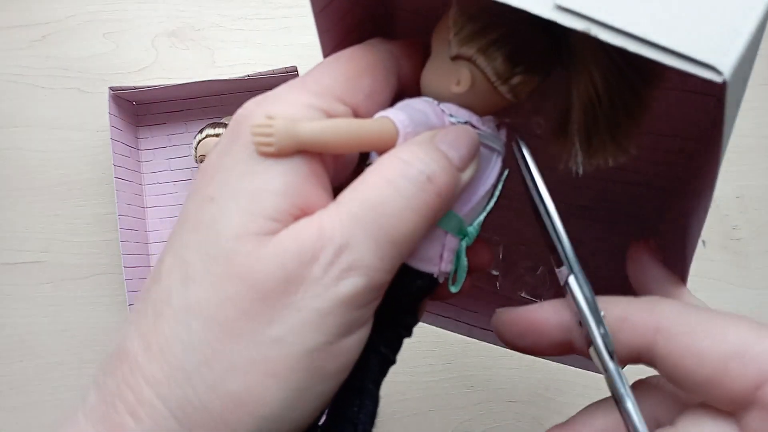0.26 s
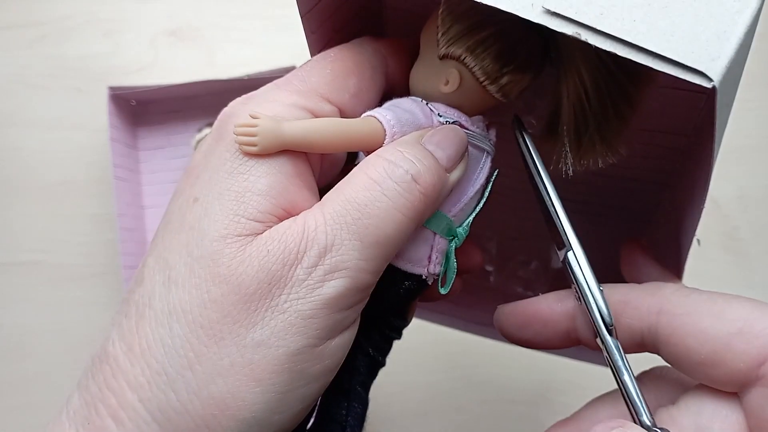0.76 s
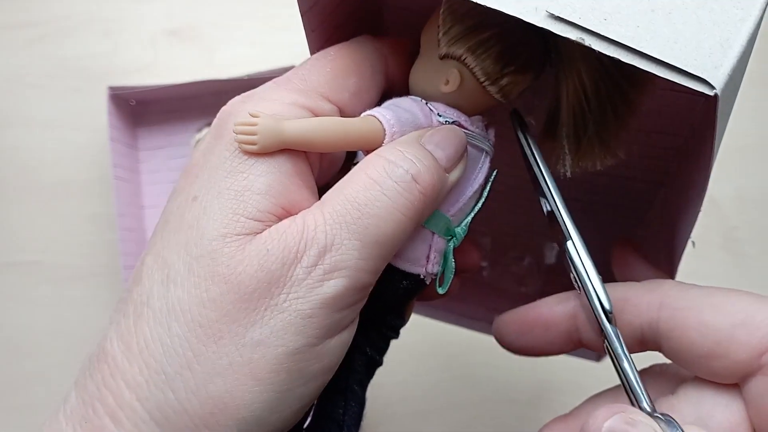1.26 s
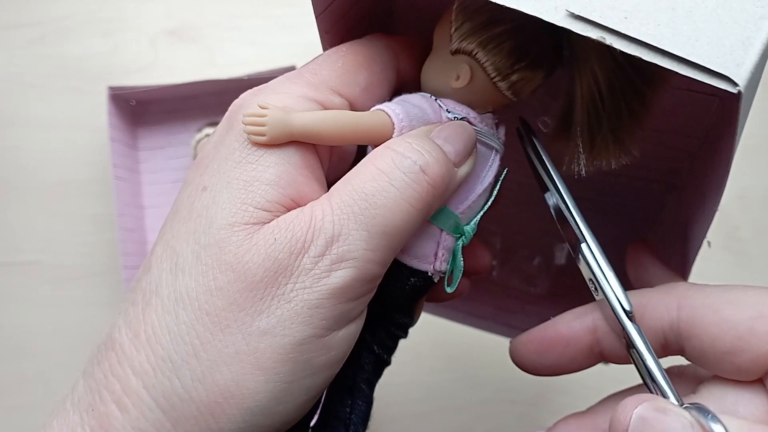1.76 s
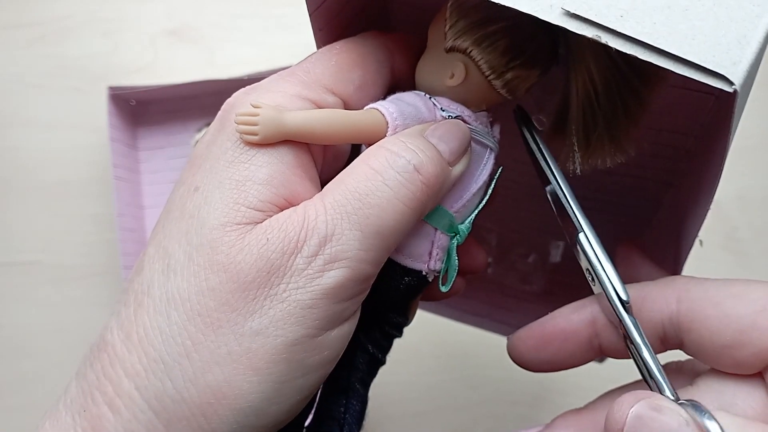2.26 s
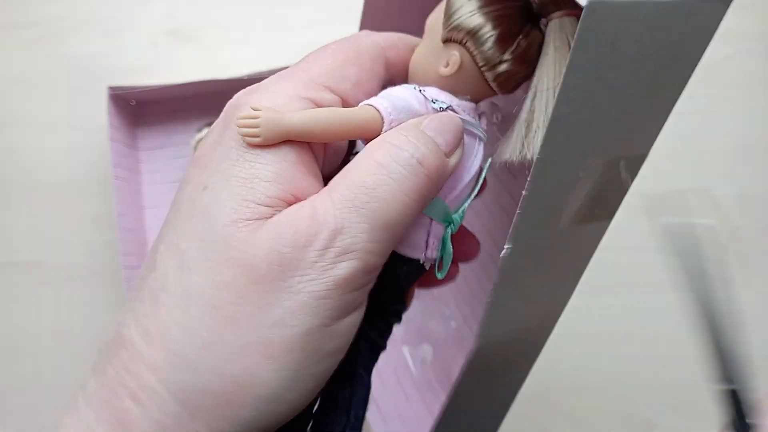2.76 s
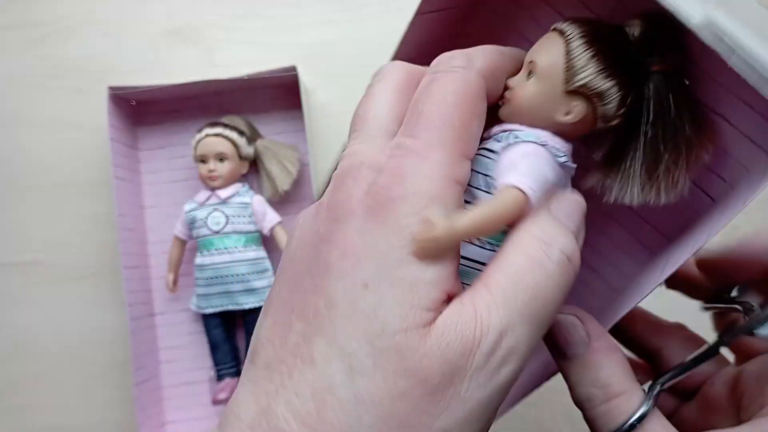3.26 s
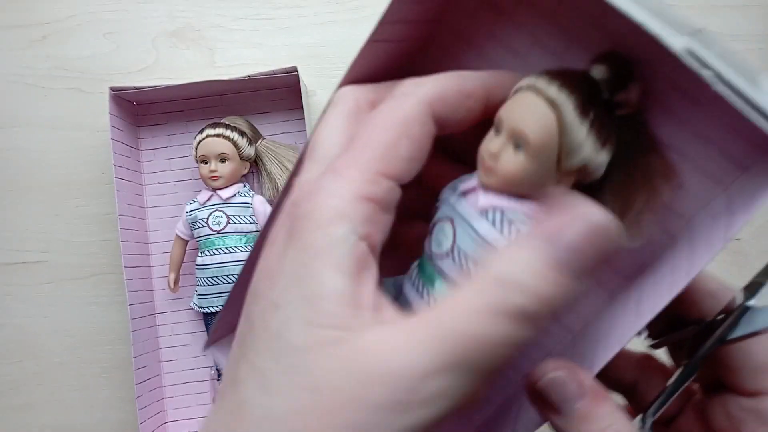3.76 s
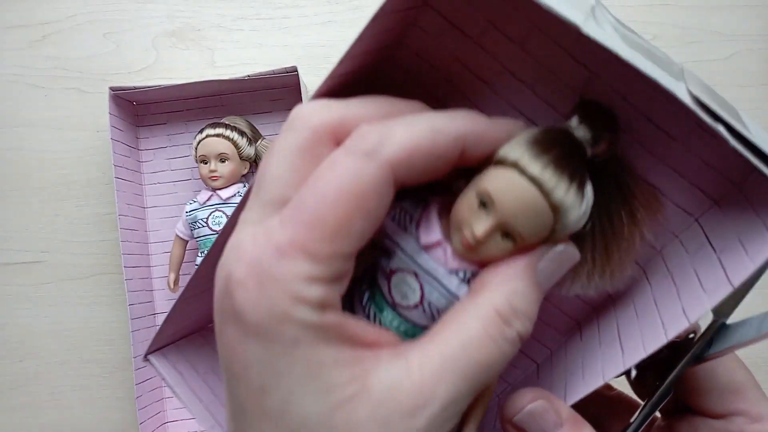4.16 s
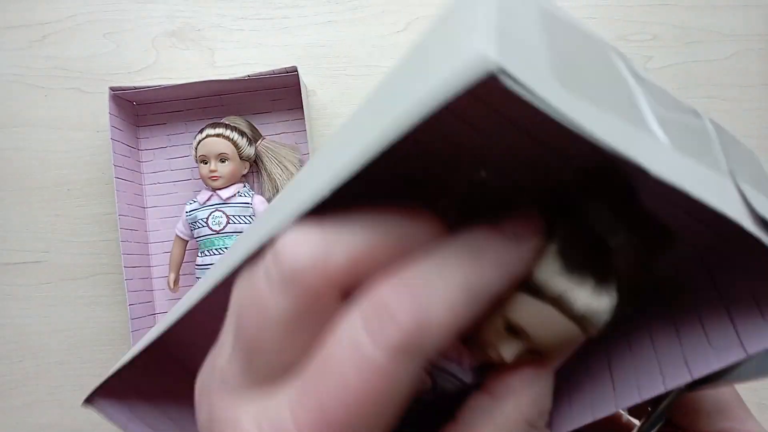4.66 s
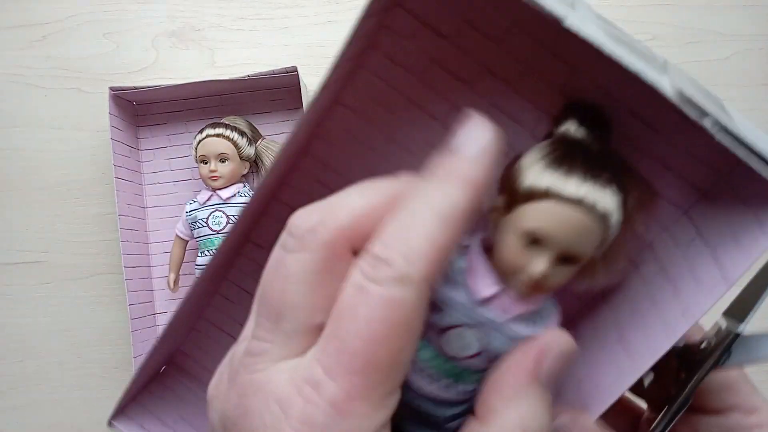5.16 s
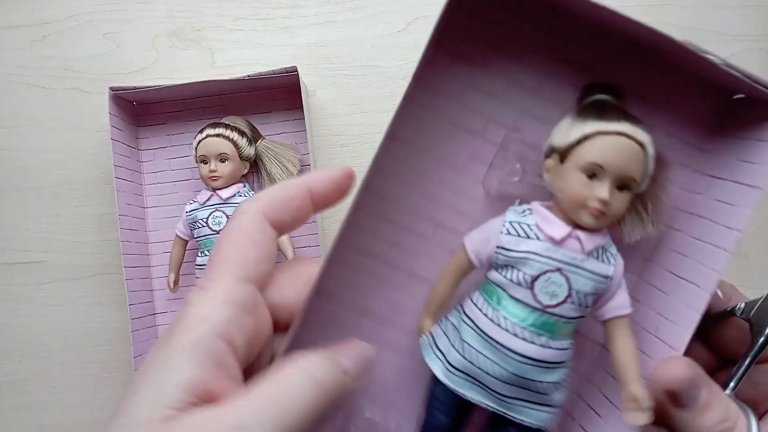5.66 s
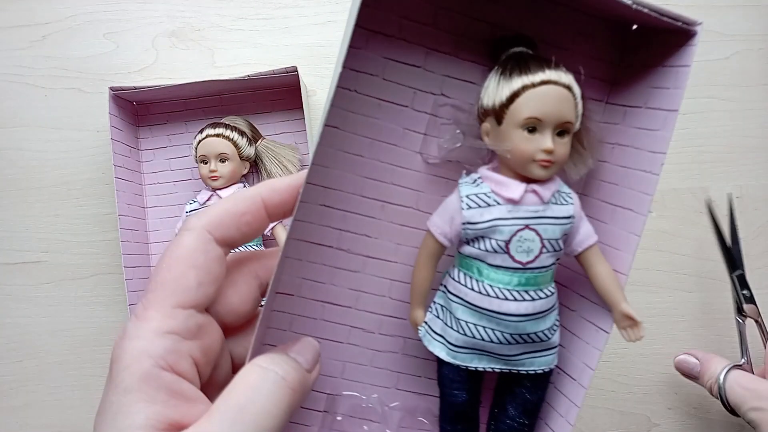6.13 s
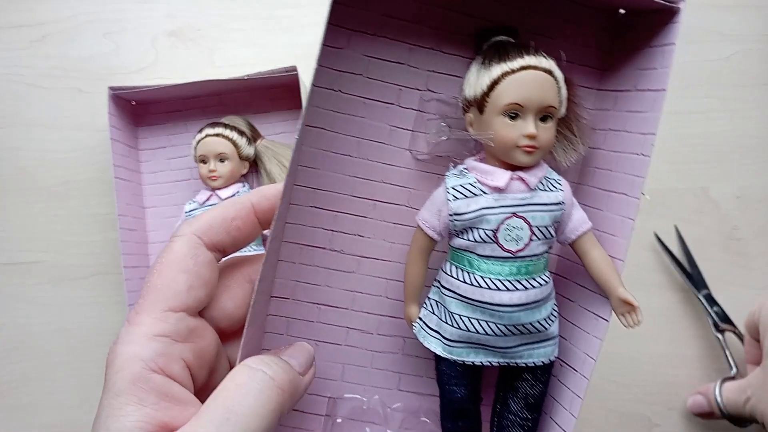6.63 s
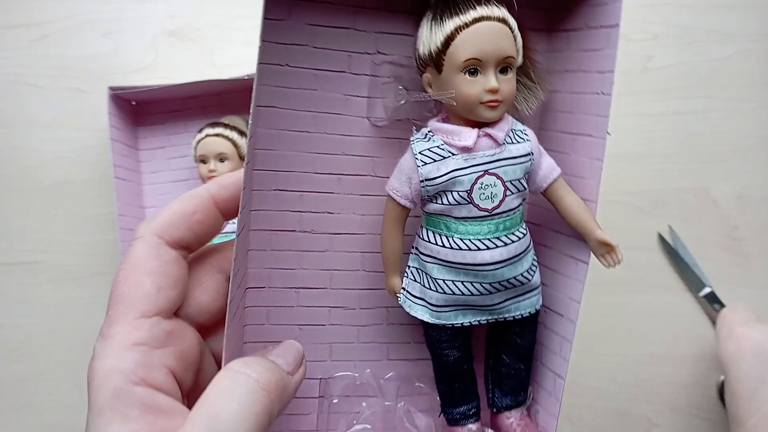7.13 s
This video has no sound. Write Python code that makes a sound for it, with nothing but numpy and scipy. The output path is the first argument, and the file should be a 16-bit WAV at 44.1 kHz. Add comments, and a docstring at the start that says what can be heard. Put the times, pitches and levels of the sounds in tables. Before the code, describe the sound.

A close stereo recording in a small furnished room, with quiet low room noise and a faint steady machine hum, fluttering about eighteen times a second with soft scuffs and tiny chirps. After a barely audible bump and rustle at 0.2 s, a loud dry plastic crack comes at 1.4. At 2.4 a pair of cracks almost merges, with a hollow thump and brief cardboard ring. A tiny blade squeak precedes a rattling cluster of box knocks around 2.75. Soft rustling strokes of cloth and hair run from 3 to 5.8, with plastic ticks, a hard hollow knock at 4.03 and lighter bumps near 5.0, 5.3 and 5.8. Small metallic pivot clicks follow from 6 to 7, clearest at 6.44 and 6.79. Blades scrape and squeak thinly from 6.6, more densely near 7.15, then scissors strike the table loudly at 7.21, a bright steel clatter with quick, weaker bounces.

```python
"""Freeing a doll from its box

Scissors snip taut plastic fasteners inside a cardboard toy box, close by in a small room: each crack is shaped noise.
The box is bumped (decaying low tones, noise bursts and rings) and the doll rustles (swelling hiss with tiny snaps).
The blades scrape and squeak, then clatter onto the table: resonances driven by noise, and decaying steel tones.
Behind it all a machine spins steadily: humming tones and, on every turn, a scuff of noise and a faint chirp."""
import sys
import numpy as np
from scipy import signal
from scipy.fft import rfft, irfft
from scipy.io import wavfile
from scipy.ndimage import uniform_filter1d

SR = 44100
rng = np.random.default_rng(int(sys.argv[2]) if len(sys.argv) > 2 else 0)


def materialize(psi):
    """Save the field psi as 16-bit PCM at rate SR to the path in sys.argv[1].

    A 1-D psi becomes a single channel; in a 2-D psi each row is a channel.
    """
    bounded = np.clip(np.atleast_2d(psi).T, -1, 1)
    quanta = np.round(bounded * 32767).astype(np.int16)
    wavfile.write(sys.argv[1], SR, quanta)


N = 325899
T = np.arange(N) / SR
HIT = T[:SR // 2]  # the half second given to each short sound

# In all tables and settings, t60 is the time of the exponential decay to fall by 60 dB.
# fasteners parting and whipping back: (time [s], crack [dB], crack t60 [s], panel ring [dB], thump [dB],
# thump pitch [Hz], blade ring [dB], left minus right [dB])
SNIPS = [(1.3771, -9, 0.021, -31, -21, 400, -52, 1.5), (2.3868, -10.5, 0.05, -13, -16, 236, -43, 1),
         (2.3980, -12.5, 0.02, -24, -40, 520, -53, 1.5)]
# colour of each of those three cracks, one list per snip: (frequency [Hz], level [dB])
CRACK_COLOURS = [
    [(60, -28), (200, -6), (500, -4), (720, -12), (1030, -5), (1400, -12), (2050, -16), (2500, 2),
     (2900, -1), (3300, -14), (3600, -3), (4000, -17), (4350, -8), (5000, -14), (9600, -4), (11700, -16),
     (12500, -8), (13500, -18)],
    [(60, -25), (200, -6), (500, -7), (1100, -7), (1400, 1), (1750, -5), (2500, 2), (3600, -3), (4300, -10),
     (5700, -6), (7000, -10), (9800, -1), (12000, -10), (16000, -20)],
    [(300, -13), (860, -2), (1100, -8), (1450, 4), (2000, 0), (2800, 1), (3600, -5), (4500, -11),
     (7000, -13), (10000, -8), (12000, -16), (16000, -26)],
]
# cardboard panels (first half) and plastic holder (second half): (frequency [Hz], level [dB], t60 [s])
BOX_MODES = [(519, -6, .05), (650, -14, .04), (869, 0, .065), (1015, -9, .04), (1315, 0, .06),
             (1535, -3, .05), (2070, -8, .035), (2495, 3, .06), (2620, -7, .04), (2782, 1, .06),
             (2932, -5, .045), (3128, -4, .06), (3420, -4, .035)]

# box and doll bumped by the hands: (time [s], cardboard clack [dB], wall thud [dB], plastic tick [dB])
KNOCKS = [(.219, -47, -54, -49), (2.645, -43, -58, -48), (2.7434, -29, -22, -45), (2.754, -31.5, -28, -43),
          (2.7625, -35, -28, -44), (2.7693, -31, -32, -42), (2.781, -45.5, -35.5, -56),
          (3.9555, -44, -31, -60), (4.013, -44.5, -38, -50), (4.0318, -21, -23.5, -34),
          (4.0628, -31.5, -42, -66), (4.717, -49, -39, -68), (5.014, -47, -37.5, -66),
          (5.028, -37, -46, -32.5), (5.034, -42.5, -33.5, -61), (5.264, -38.5, -45, -45),
          (5.285, -45, -37, -64), (5.315, -39, -36, -49), (5.7713, -47, -40.5, -40), (5.792, -42, -38, -44),
          (5.903, -42.5, -40.5, -48), (5.914, -44.5, -39.5, -56)]
# colour of the cardboard clack: (frequency [Hz], level [dB])
CLACK_COLOUR = [(250, -1), (900, 0.5), (1120, -2), (1350, 2.5), (1700, 5), (2080, 1.5), (2330, -16),
                (2600, -8), (3200, -29), (4000, -11.5), (12000, -25)]
# colour of the stiff plastic jolted through the box: (frequency [Hz], level [dB])
JOLT_COLOUR = [(1000, -13), (2500, 4.5), (6000, 1.5), (8500, 2.5), (10300, 9), (12000, -13), (16000, -24)]
# the shaken holder buzzes against the box: (time [s], level [dB])
RATTLES = [(2.754, -35), (2.7622, -37), (2.7695, -39)]
# the plastic holder ticks as it flexes: (time [s], level [dB])
TICKS = [(3.008, -48.5), (3.509, -45), (4.0, -36), (4.747, -42.5), (5.0234, -29.5), (5.0825, -42),
         (5.7713, -36.5)]
# colour of those ticks: (frequency [Hz], level [dB])
TICK_COLOUR = [(1000, -33), (3000, -0.5), (6000, -5), (8000, 6), (10500, 13.5), (12500, 1), (16000, -4)]
KNOCK_PAN_DB, TICK_PAN_DB = 2.5, -2  # left minus right
TICK_T60_S = 0.015
# a softer contact flexes a larger, lower patch of the wall
THUD_HZ = 571
THUD_OCTAVE_DB = 21  # excess of thud over clack that lowers it an octave
THUD_SCATTER_OCTAVES = 0.055  # no two contacts land on the same spot
THUD_CYCLES = 13  # swings until the wall has died away

# strokes of hair, cloth and skin in the box: (middle [s], length [s], level [dB], extra treble [dB])
RUBS = [(0.234, .06, -57.5, 2), (3.002, 0.055, -66, 9), (3.42, 0.15, -54, 1.5), (3.544, .09, -51, -9),
        (3.67, 0.042, -53.5, -6), (3.85, 0.18, -53, -2), (4.043, 0.24, -54.5, 1.5), (4.79, 0.11, -56.5, 2),
        (5.016, .1, -51.5, 5.5), (5.28, 0.15, -58.5, -1), (5.67, 0.041, -55, 4), (5.745, .06, -53.5, 2),
        (5.814, .07, -49, 8)]
# colour of their hiss: (frequency [Hz], level [dB])
RUSTLE_COLOUR = [(300, 10.5), (700, 8), (1500, 4.5), (3000, -4.5), (6000, -9.5), (8500, -4.5), (10300, -4),
                 (12000, -11), (15500, -19)]
RUB_EDGE_DB, RUB_SHAPE = -6, 1.53  # level at either end of a stroke; roundness of its swell
CRACKLE_DB = -11  # snaps relative to the hiss
RUB_TREBLE_HZ = 6000  # the extra treble begins here

# blades sliding over each other; the last row is a brief, high steel ring as the scissors touch down:
# (middle [s], length [s], squeak or ring [dB], scrape [dB], squeak or ring frequency [Hz],
# glide [share of that frequency over the stroke])
SLIDES = [(2.016, .009, -51, -62, 1300, 0), (2.652, 0.021, -49, -58, 1450, 0.26),
          (6.627, 0.031, -58, -54, 3010, 0), (6.797, 0.016, -54, -54, 1980, 0),
          (6.853, .058, -51, -48.5, 2910, -0.089), (7.013, 0.037, -53, -55, 3350, 0.063),
          (7.136, .048, -48.5, -47.5, 3740, -0.014), (7.145, 0.063, -48.5, -47, 4640, -.02),
          (7.163, 0.042, -53, -46, 2720, -.04), (7.199, 0.021, -48, -44, 12950, 0)]
# resonances of the hand-held blades: (frequency [Hz], width [Hz], level [dB])
BLADE_RESONANCES = [(2070, 100, -6), (2860, 320, -3), (4630, 130, -4), (5650, 260, -6), (7600, 220, -2),
                    (8800, 550, -1.5), (10400, 200, 3), (11700, 700, -8), (13100, 220, -4),
                    (14600, 500, -11)]
# bending modes stirred by a squeak: (frequency [multiple of its pitch], level [dB])
SQUEAK_MODES = [(.71, -9), (1.58, -15), (2.63, -7)]
# the loose scissors click at the pivot: (time [s], level [dB])
CLICKS = [(5.974, -41), (6.163, -57), (6.372, -54.5), (6.4374, -36.5), (6.535, -44), (6.789, -30.5),
          (6.991, -43)]
# colour of those clicks: (frequency [Hz], level [dB])
PIVOT_COLOUR = [(1000, -30), (3000, 0), (6000, -4), (8000, 3), (10700, 12), (12000, 4), (16000, 0)]
SLIDE_SHAPE, RASP_DB = 2.5, 2.4  # squareness of a stroke; unevenness of its scrape
CLICK_T60_S, CLICK_RING_DB, CLICK_PAN_DB = 0.04, -22, -1.5

# scissors landing on the table: (time [s], level [dB], table knock [dB], left minus right [dB])
DROPS = [(7.188, -46, -36, 0), (7.194, -46, -39, 0), (7.211, -13, -33.5, 3.5), (7.2122, -12, -39.5, -12.5),
         (7.220, -26.5, -50, 11), (7.245, -30.5, -42, 0), (7.2548, -23.5, -40, 1), (7.270, -37, -42.5, 6)]
# steel resonances, broadened while the scissors touch the table:
# (frequency [Hz], width [Hz], level [dB], left minus right [dB])
CLATTER = [(1612, 260, -12.5, -4.5), (2912, 260, -0.5, 0), (3660, 870, -2, 5), (4550, 180, -1, -2),
           (5850, 490, 2.5, -5), (8000, 760, -2.5, -4), (9100, 540, -6, 2), (10040, 230, -2.5, 4),
           (11150, 370, -4.5, 16), (13000, 350, -1.5, 5), (14780, 220, -9, 0)]
# free ring of the steel blades and handles: (frequency [Hz], level [dB], t60 [s])
STEEL_MODES = [(2283, -12, .2), (2817, -6, .08), (4604, -4, .09), (4720, -5, .08), (5790, -4, .07),
               (9163, 0.5, .16), (10168, -8, .12), (10531, -6, .09), (11414, -2, .1), (12713, -2, .15),
               (12906, -4, .15), (12971, -2, .15), (14120, -12, .16), (14770, -9, .13)]
# a firm blow lifts off at once, a light one skids on: (level [dB], t60 [s])
SKID = [(-20, 0.07), (-12, 0.023)]
# colour of a knock on the wooden table top: (frequency [Hz], level [dB])
TABLE_COLOUR = [(200, 2), (450, 3), (750, -5), (1250, 2), (1900, 2), (2600, -4), (12000, -22)]
DROP_RING_DB = -16  # free ring relative to the blow

# the machine's hum, before its slight drift: (frequency [multiple of the turning rate], rms level [dB])
HUM = [(3.2, -63.5), (4.86, -51.5), (6, -49.5), (7, -56.5), (9, -55), (10, -58), (20, -71), (34, -70.5)]
# the chirp that the machine makes on each turn, before its flicker: (time [s], level [dB])
CHIRP = [(.5, -60.5), (2.2, -63), (3.0, -67), (6.0, -66.5)]
# colour of the scuff once a turn: (frequency [Hz], level [dB])
SCUFF_COLOUR = [(900, -7), (1600, 12.5), (2200, -25), (3900, 2.5), (4600, -26.5), (8000, -6.5),
                (14000, -42)]
TURN_HZ = 18.3  # turns per second
CHIRP_AT_TURN = 0.29  # place of chirp and scuff, as a share of a turn
# colour of the steady room noise: (frequency [Hz], relative level per Hz [dB])
AIR_COLOUR = [(20, -14), (42, -16.5), (75, -9), (110, -2), (150, -6), (205, -1), (300, -8), (430, -18),
              (900, -16.5), (1200, -22.5), (2200, -24.5), (3300, -32.5), (3950, -32.5), (4500, -37),
              (7000, -41.5), (10200, -36), (12000, -48.5), (16000, -56.5)]
AIR_DB = -46
# stereo width of noise in the room: (frequency [Hz], side minus mid [dB])
WIDTH = [(60, -22), (200, -20.5), (380, -3.5), (700, 2.5), (1290, 2.5), (2400, 2), (4400, -1), (15000, 0.5)]
# stereo width of sounds close to the microphones: (frequency [Hz], side minus mid [dB])
NEAR_WIDTH = [(100, -5), (400, -8), (2500, -2), (8000, 0.5)]
# colour of the room's tail: (frequency [Hz], level [dB])
ROOM_COLOUR = [(100, -12), (500, 11), (1000, 2.5), (2700, -5), (6000, -2.5), (10000, -5.5), (15000, -4.5)]
LOW_CUT_HZ, TOP_HZ = 42, 16200  # limits of the recorder


def snips():
    """The plastic gives way: a crack, the freed box wall thumps and rings, the blades meet."""
    out = np.zeros((2, N))
    for snip, colour in zip(SNIPS, CRACK_COLOURS):
        s, crack_db, t60, panel_db, thump_db, thump_hz, blade_db, pan_db = snip
        crack = amp(crack_db) * burst(colour, t60)
        panels = amp(panel_db) * ring(BOX_MODES)
        thump = amp(thump_db) * thud(thump_hz, t60=0.048, spread=1.36, share=0.4) * balance(pan_db=2.0)
        steel = amp(blade_db) * ring(STEEL_MODES)
        add(out, s, crack + panels + thump + steel, pan_db)
    return out


def handling():
    """The box is bumped and rebounds, rattling the holder; the holder also ticks on its own."""
    out = np.zeros((2, N))
    for s, clack_db, thud_db, tick_db in KNOCKS:
        add(out, s, knock(clack_db, thud_db, tick_db), KNOCK_PAN_DB)
    for s, db in RATTLES:
        buzz = resonance(hz=3270, width=260) * fade(t60=0.028)
        add(out, s, amp(db) * buzz, pan_db=-2.0)
    for s, db in TICKS:
        add(out, s, amp(db) * burst(TICK_COLOUR, TICK_T60_S), TICK_PAN_DB)
    return out


def knock(clack_db, thud_db, tick_db):
    """One contact: the wall thuds, the cardboard clacks, the stiff plastic ticks."""
    half = len(BOX_MODES) // 2
    cardboard, plastic = BOX_MODES[:half], BOX_MODES[half:]
    octaves_down = min(clack_db - thud_db, 0) / THUD_OCTAVE_DB  # zero or negative
    scatter = THUD_SCATTER_OCTAVES * rng.uniform(-1, 1)
    hz = THUD_HZ * 2 ** (octaves_down + scatter)
    wall = thud(hz, t60=THUD_CYCLES / hz, spread=1.3, share=0.28)
    clack = burst(CLACK_COLOUR, t60=0.017) + amp(-13) * ring(cardboard)
    tick = amp(-1.5) * burst(JOLT_COLOUR, t60=0.032) + amp(-11.5) * ring(plastic)
    return amp(thud_db) * wall + amp(clack_db) * clack + amp(tick_db) * tick


def thud(hz, t60, spread, share):
    """A cardboard wall flexing: one low mode and its two neighbours."""
    modes = [(1 / spread, share), (1, 1), (spread, share)]
    return sum(size * np.sin(2 * np.pi * hz * ratio * HIT) for ratio, size in modes) * fade(t60)


def blades():
    """Edge rubs on edge in uneven slips, with gliding squeaks; the pivot clicks; a high ring at touchdown."""
    out = np.zeros((2, N))
    for s, length, tone_db, scrape_db, tone_hz, glide in SLIDES:
        travel = HIT / length - 2  # 0 in the middle of the stroke
        pressure = np.exp(-abs(2 * travel) ** SLIDE_SHAPE)
        rasp = amp(RASP_DB * walk(350)[:len(HIT)])
        steel = sum(amp(db) * resonance(hz, width) for hz, width, db in BLADE_RESONANCES)
        scrape = amp(scrape_db) * unit(steel * rasp)
        pitch = tone_hz * (1 + glide * np.clip(travel, -.5, .5))  # the contact point travels along the blade
        add(out, s - 2 * length, pressure * (scrape + amp(tone_db) * steel_tone(pitch)), 0)
    for s, db in CLICKS:
        click = burst(PIVOT_COLOUR, CLICK_T60_S) + amp(CLICK_RING_DB) * ring(STEEL_MODES)
        add(out, s, amp(db) * click, CLICK_PAN_DB)
    return out


def steel_tone(hz, wobble=0.75, flutter_db=3.2):
    """A squeak (blades stick and slip) or high ring: one unsteady pitch, which stirs other bending modes."""
    wander = wobble * walk(340)[:len(HIT)]
    start = rng.uniform(0, np.pi / 2, (2, 1))  # differs between the two microphones
    phase = 2 * np.pi * np.cumsum(hz) / SR + wander + start
    tone = unit(np.sin(phase) * amp(flutter_db * walk(250)[:len(HIT)]))
    audible = [(ratio, db) for ratio, db in SQUEAK_MODES if ratio * hz.max() < TOP_HZ]
    return tone + sum(amp(db) * resonance(ratio * hz, width=90) for ratio, db in audible)


def scissors_down():
    """The scissors land, bounce and ring free between the contacts."""
    out = np.zeros((2, N))
    for s, blow_db, table_db, pan_db in DROPS:
        t60 = np.interp(blow_db, *np.transpose(SKID))
        steel = sum(amp(db) * balance(side_db) * resonance(hz, width) for hz, width, db, side_db in CLATTER)
        clatter = unit(steel) * fade(t60)
        blow = amp(blow_db) * (clatter + amp(DROP_RING_DB) * ring(STEEL_MODES))
        table = amp(table_db) * burst(TABLE_COLOUR, t60=0.067)
        add(out, s, blow + table, pan_db)
    return out


def rubbing():
    """Strokes swell and die away; fibres catch and slip, breaking the hiss into grains of uneven size."""
    grains = unit(amp(2.2 * walk(700) + 3.4 * walk(45)))
    hiss = noise(RUSTLE_COLOUR, N) * grains + amp(CRACKLE_DB) * crackle()
    dull = signal.sosfiltfilt(signal.butter(2, RUB_TREBLE_HZ, fs=SR, output="sos"), hiss)
    treble = hiss - dull
    out = 0
    for s, length, db, treble_db in RUBS:
        pressure = amp(db + RUB_EDGE_DB * abs(2 * (T - s) / length) ** RUB_SHAPE)
        out = out + pressure * (dull + amp(treble_db) * treble)
    return out


def crackle(per_s=70, t60=0.007):
    """Single fibres snap free at random moments, each with a tiny tick."""
    snaps = (rng.random(N) < per_s / SR) * rng.uniform(-1.06, 1, N)
    return unit(signal.fftconvolve(snaps[None], burst(JOLT_COLOUR, t60), axes=1)[:, :N])


def machine(chirp_hz=3880, scuff_db=-61, chirp_turns=0.069, scuff_turns=0.51):
    """A spinning machine hums on and between multiples of its turning rate, and scuffs and chirps each turn."""
    hum = 0
    for multiple, db in HUM:
        level = amp(db + 1.0 * walk(5)) * np.sqrt(2)  # a sine's peak is root 2 times its rms
        phase = 2 * np.pi * multiple * TURN_HZ * T + 0.19 * walk(4) + rng.uniform(0, 2 * np.pi)
        hum = hum + level * np.sin(phase)
    turn = (TURN_HZ * T - CHIRP_AT_TURN + .5) % 1 - .5  # 0 at the chirp, -0.5 to 0.5 over a turn
    chirp_level = amp(np.interp(T, *np.transpose(CHIRP)) + 2 * walk(18)) * np.sqrt(2)
    chirp_tone = np.sin(2 * np.pi * chirp_hz * T + .7 * walk(400))
    chirp = chirp_level * np.exp(-(turn / chirp_turns) ** 2) * chirp_tone
    scuff = amp(scuff_db) * np.exp(-(turn / scuff_turns) ** 2) * noise(SCUFF_COLOUR, N)
    return hum + chirp + scuff


def air():
    """Steady room noise: coloured hiss and rumble whose level drifts slightly."""
    return amp(AIR_DB + .5 * walk(6)) * noise(AIR_COLOUR, N)


def room(x, wet_db=-19, t60=0.3):
    """A furnished room: its many reflections blur into a short, faint tail of fading noise."""
    tail = noise(ROOM_COLOUR, len(HIT)) * fade(t60, rise=0.0022)
    tail = tail / np.sqrt(np.sum(tail ** 2) / 2)
    return x + amp(wet_db) * signal.fftconvolve(x, tail, axes=1)[:, :N]


def burst(points, t60):
    """A short decaying noise whose spectrum is evened out, then coloured."""
    decay = fade(t60, rise=0.00034)
    spectrum = rfft(noise(points, len(HIT), NEAR_WIDTH) * decay)
    # average strength around each frequency
    local = np.sqrt(uniform_filter1d(abs(spectrum) ** 2, size=240) + 1e-12)
    sound = irfft(spectrum / local * gains(points, len(HIT)))
    sound = sound * (HIT < HIT[-1] / 2)  # silence the second half
    return unit(sound) * np.sqrt(np.mean(decay ** 2))


def ring(modes):
    """Separate modes; each reaches the two microphones in a slightly different phase."""
    out = 0
    for hz, db, t60 in modes:
        phase = rng.uniform(0, 2 * np.pi) + 0.56 * rng.standard_normal((2, 1))
        out = out + amp(db) * np.sin(2 * np.pi * hz * HIT + phase) * fade(t60)
    return out / np.sqrt(sum(amp(db) ** 2 for _, db, _ in modes))


def resonance(hz, width):
    """A resonance kept ringing by random contact, rms 1; its centre may glide."""
    push = rng.standard_normal((2, len(HIT))) + 1j * rng.standard_normal((2, len(HIT)))
    # slow random swings, moved up to the centre frequency; the width is where their gain has halved
    slow = 1 / (1 + (np.fft.rfftfreq(len(HIT), 1 / SR) / width) ** 2)
    swing = irfft(rfft([push.real, push.imag]) * slow)
    phase = 2 * np.pi * np.cumsum(hz * np.ones(len(HIT))) / SR
    return unit(swing[0] * np.cos(phase) + swing[1] * np.sin(phase))


def noise(points, size, stereo=WIDTH):
    """Coloured stereo noise of rms 1; the stereo table sets how far the microphones differ by frequency."""
    mid, side = rfft(rng.standard_normal((2, size)))
    width = gains(stereo, size)
    left_right = mid + np.array([[1], [-1]]) * width * side
    return unit(irfft(left_right * gains(points, size) / np.hypot(1, width), size))


def fade(t60, rise=0.00055):
    """A quick rise (time constant in s) and an exponential decay."""
    return (1 - np.exp(-HIT / rise)) * np.exp(-np.log(1000) * HIT / t60)


def walk(rate):
    """Smoothed random wandering of rms 1, with a new target about rate times a second."""
    k = int(SR / rate)
    steps = np.repeat(rng.standard_normal(N // k + 1), k)[:N]
    return unit(uniform_filter1d(steps, k))


def gains(points, size):
    """Gain at every frequency of a sound of this size, drawn through (frequency [Hz], level [dB]) points."""
    hz, db = np.transpose(points)
    log_hz = np.log(np.fft.rfftfreq(size, 1 / SR) + 1)  # the 1 avoids log of zero
    return amp(np.interp(log_hz, np.log(hz), db))


def amp(db):
    """Decibels to gain."""
    return 10 ** (np.asarray(db) / 20)


def unit(x):
    """Scale to rms 1."""
    return x / np.sqrt(np.mean(x ** 2))


def balance(pan_db):
    """Left and right gains that differ by pan_db."""
    return amp(np.array([[pan_db], [-pan_db]]) / 2)


def add(out, s, sound, pan_db):
    """Mix a sound in at time s."""
    i = int(s * SR)
    out[:, i:i + len(HIT)] += (sound * balance(pan_db))[:, :N - i]


def scene():
    """The hands' work in the room, over the machine and the room noise."""
    hands = snips() + handling() + rubbing() + blades() + scissors_down()
    return room(hands) + machine() + air()


def record(dry):
    """The recorder drops the deepest bass, clips at full scale and cuts the top."""
    lean = signal.sosfilt(signal.butter(4, LOW_CUT_HZ, "high", fs=SR, output="sos"), dry)
    clipped = np.clip(lean, -1, 1)
    return signal.sosfilt(signal.ellip(10, .2, 70, TOP_HZ, fs=SR, output="sos"), clipped)


dry = scene()
out = record(dry)
materialize(out)
```